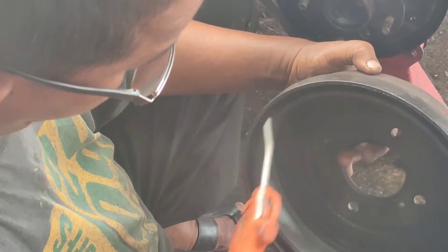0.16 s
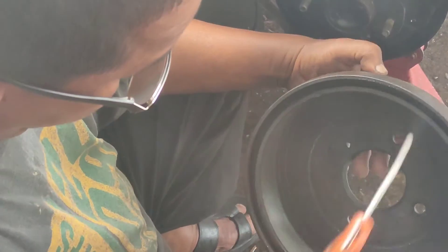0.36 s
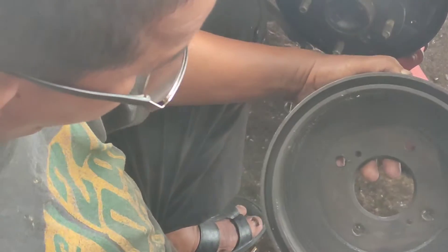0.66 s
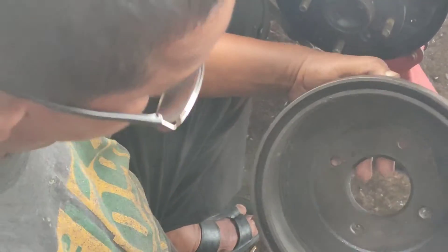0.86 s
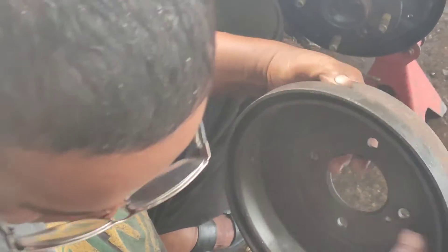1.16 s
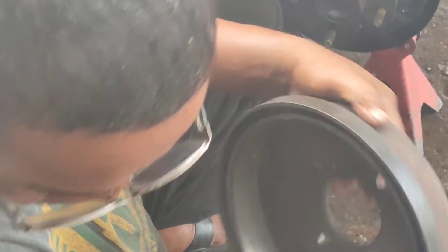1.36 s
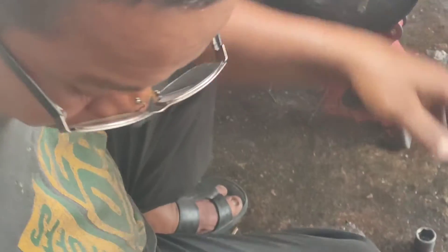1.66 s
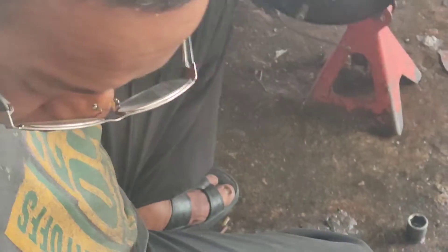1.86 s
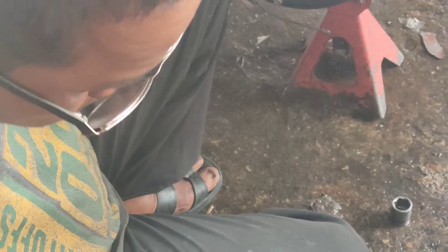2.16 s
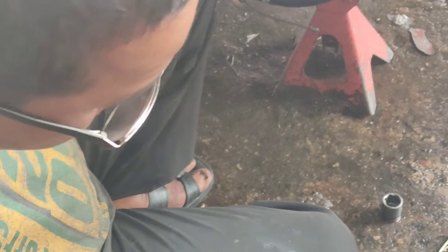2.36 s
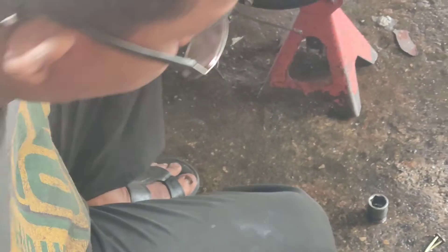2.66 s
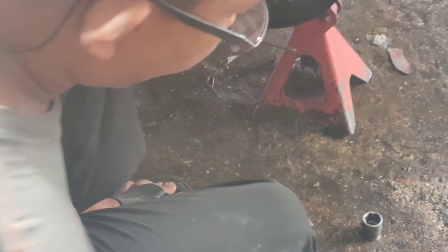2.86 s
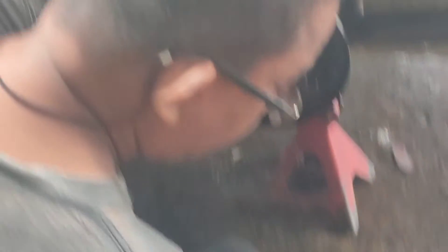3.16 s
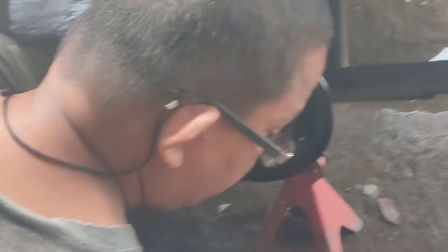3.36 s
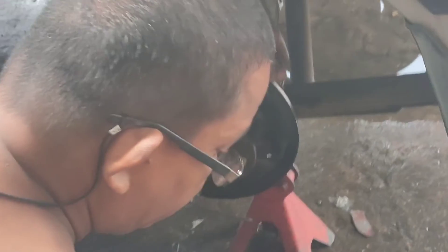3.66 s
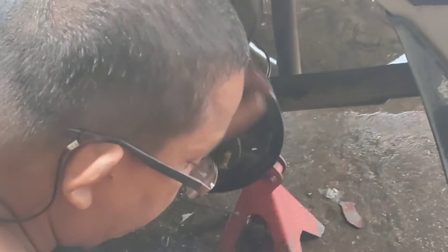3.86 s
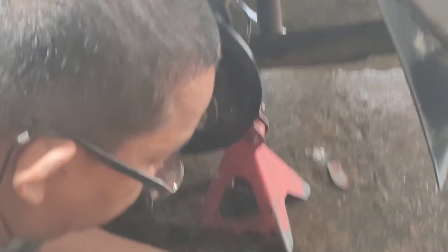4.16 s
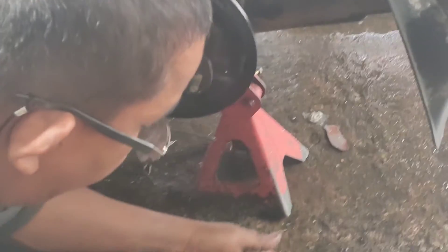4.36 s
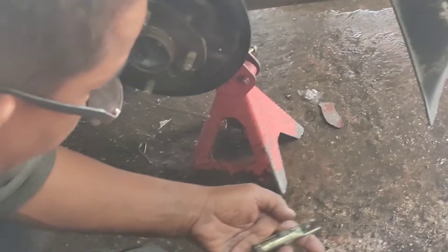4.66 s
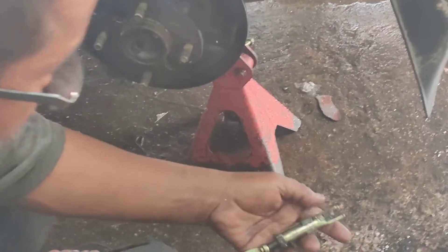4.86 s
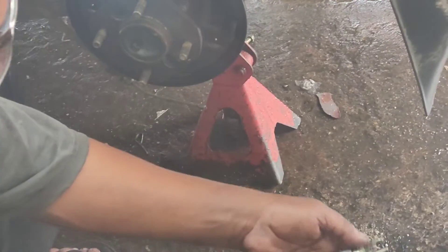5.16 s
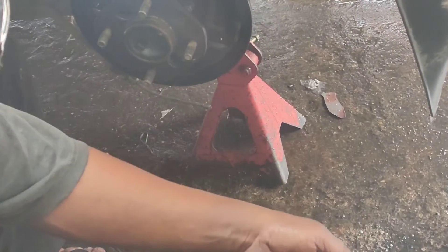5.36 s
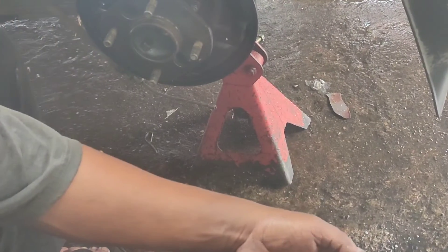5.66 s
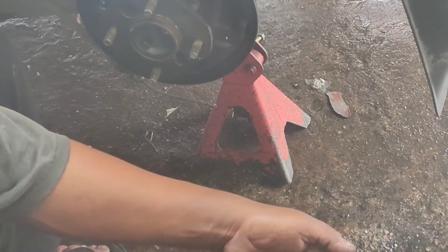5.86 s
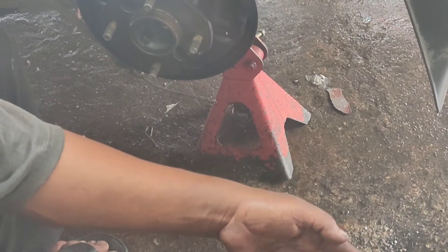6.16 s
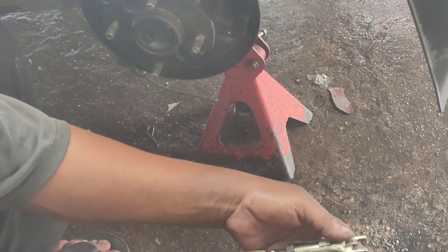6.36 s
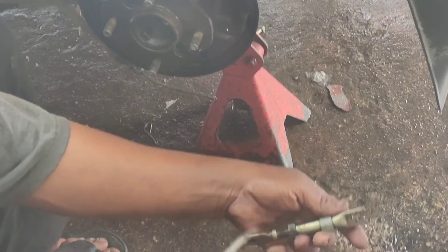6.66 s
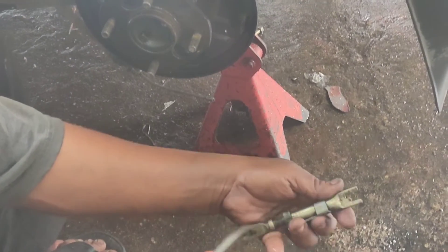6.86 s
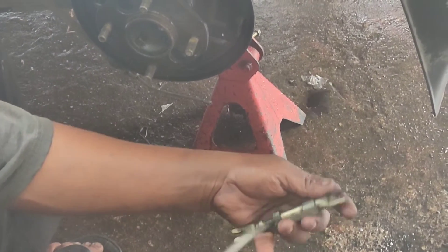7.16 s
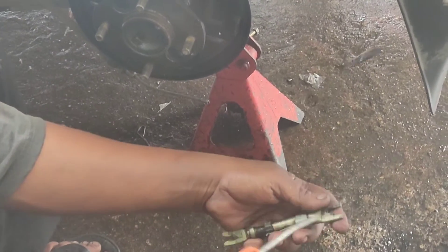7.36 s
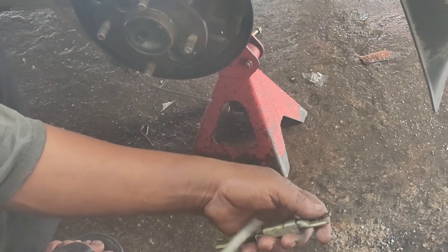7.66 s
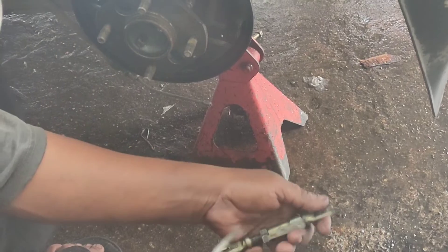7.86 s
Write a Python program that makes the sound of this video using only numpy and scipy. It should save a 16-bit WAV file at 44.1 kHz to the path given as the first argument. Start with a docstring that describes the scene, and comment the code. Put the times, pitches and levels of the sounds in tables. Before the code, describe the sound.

A close air blow gun hisses and cuts off, a compressor drones, an iron brake drum clanks onto gritty ground, then a long air blast returns.

```python
"""A blow gun is already hissing close to a two-port microphone in an open garage, and is fired again later on.
The hiss is coloured turbulent noise; the wind drives each port into its own soft limit.
A compressor drone lies under everything, and a coupling leaks between the bursts: both are filtered noise.
An iron brake drum is knocked, set down on gravel and scraped, as decaying modes plus noise clatter.
Shaped puffs and strokes of noise make a scuff and a few small ticks."""
import sys
import numpy as np
from scipy import signal
from scipy.fft import rfft, irfft, next_fast_len
from scipy.io import wavfile
from scipy.ndimage import uniform_filter1d

SR = 44100
rng = np.random.default_rng(int(sys.argv[2]) if len(sys.argv) > 2 else 0)


def dump(signal):
    """Clip the signal to [-1, 1] and save it as 16-bit WAV at the path in sys.argv[1]."""
    limited = np.clip(np.atleast_2d(signal).T, -1, 1)
    pcm = np.round(limited * 32767).astype(np.int16)
    wavfile.write(sys.argv[1], SR, pcm)


N = 353238

# trigger pulled and let go: open_s, shut_s, hiss_db before aim and surge, wind_db before surge and lulls
BURSTS = [(-0.1, 0.657, -23.5, -24), (5.317, 8.2, -21.5, -23.5)]
# how alike distant sound is at the two ports: frequency_hz, likeness (-1 to 1)
LIKENESS = [(60, 0.81), (180, 1), (550, 0.63), (1650, -0.17), (4970, 0.5), (15000, -0.6)]
SIDES = np.array([[.5], [-.5]])  # shares a left-right difference in dB between the channels


def amp(db):
    """Turns dB into an amplitude factor."""
    return 10 ** (np.asarray(db) / 20)


def evened(x):
    """Scales a signal to rms 1."""
    return x / np.sqrt(np.mean(x ** 2) + 1e-20)


def read(points, hz):
    """Reads a curve of (frequency, value) rows along a logarithmic frequency axis."""
    f, value = np.transpose(points)
    return np.interp(np.log(hz + 1), np.log(f + 1), value)


def lift(peaks, hz):
    """Sums the dB added by resonant peaks (centre, width, lift)."""
    return sum(db / (1 + (2 * (hz - f) / width) ** 2) for f, width, db in peaks)


def coloured(x, db_at):
    """Filters x by a dB function of frequency."""
    size = next_fast_len(N + 4096)
    gain = amp(db_at(np.fft.rfftfreq(size, 1 / SR)))
    return irfft(rfft(x, size) * gain, size)[..., :N]


def noise(db_at, patchy_db, same=((0, 0.), (1, 0.))):
    """Makes two channels of noise, rms 1, with drifting patches in time and frequency."""
    frames, hz = N // 128 + 5, np.fft.rfftfreq(512, 1 / SR)
    a, b, c, d, patches = rng.standard_normal((frames, 257, 5)).T
    patches = uniform_filter1d(patches, 12, 0)  # across frequency
    patches = evened(uniform_filter1d(patches, 24, 1))  # across time
    like = np.clip(read(same, hz), -1, 1)[:, None]
    left = a + 1j * b
    right = like * left + np.sqrt(1 - like ** 2) * (c + 1j * d)
    spectra = np.array([left, right]) * amp(patchy_db * patches)
    sound = signal.istft(spectra, nperseg=512, noverlap=384)[1][:, :N]
    return evened(coloured(sound, db_at))


def wander(hz):
    """Makes slow chance of rms 1, one track per channel, 6 dB down at hz."""
    return evened(coloured(rng.standard_normal((2, N)), lambda f: -20 * np.log10(1 + (f / hz) ** 2)))


def trigger_db(late_s, shut_db):
    """Per burst, dB around full flow: valve rise, pressure surge, hold, then shut_db(seconds since shut)."""
    open_s, surge_db, surge_s = 0.038, 3.5, 0.018
    t = np.arange(N) / SR
    tracks = []
    for start, end, *_ in BURSTS:
        rise_db = 20 * np.log10(np.clip((t - start - late_s) / open_s, 1e-5, 1) ** 2)
        surge = surge_db * np.exp(-abs(t - start - open_s) / surge_s)
        tracks.append(rise_db + surge + shut_db(np.maximum(t - end, 0)))
    return tracks


def hiss_db():
    """Left and right level of the nozzle: the valve snaps shut, then the barrel bleeds."""
    # the hiss follows the aim of the gun: time_s, change_db
    aim = [(0, -1.5), (.4, -2), (.48, -2.5), (.59, -1.5), (5.53, -2), (6.0, -0.5), (6.32, -0.5),
           (6.5, -2.5), (6.68, 0.5), (7.1, -2), (7.18, 1), (7.32, -5), (7.6, -0.5), (7.7, -1), (7.8, 2),
           (7.95, -0.5), (8.01, 0.5)]
    shut_db_per_s, bleed_db, bleed_db_per_s, lean_db = 700, -3, 118, 4.5

    def fall(s):
        return np.maximum(-shut_db_per_s * s, bleed_db - bleed_db_per_s * s)

    flow = np.max([row[2] + db for row, db in zip(BURSTS, trigger_db(0, fall))], axis=0)
    return flow + np.interp(np.arange(N) / SR, *np.transpose(aim)) + SIDES * lean_db


def nozzle():
    """Turbulent mixing noise, fluttering a little as the hand moves."""
    # colour of the jet at the nozzle: frequency_hz, relative_level_db per Hz
    jet_colour = [(300, -4.5), (1500, 4), (3000, -4.5), (4200, -4.5), (6000, 0.5), (9000, 0.5), (12000, 0),
                  (16000, -3.5)]
    flutter_db = 1.0 * wander(hz=25) + 0.63 * wander(hz=10)
    return amp(hiss_db() + flutter_db) * noise(lambda f: read(jet_colour, f), patchy_db=1.4)


def wind_db():
    """Left and right bite of the wind: it arrives late, drops, and after the shut trails off in a slower tail."""
    # the jet swings off the ports for a moment: middle_s, length_s, left_dip_db, right_dip_db
    lulls = [(0.0, .05, 10, 1), (0.051, 0.047, 7, 4.5), (0.13, 0.11, 3, -1), (0.274, 0.11, 8.5, 0),
             (0.461, 0.084, 9.5, 8), (0.51, 0.035, 14, 7.5), (0.584, 0.052, 3, 2.5), (0.65, 0.075, 9, 0),
             (5.345, 0.11, 9.5, 1.5), (6.364, 0.047, 7, 1), (7.052, 0.049, 6, 2.5), (7.266, .048, 16, 12),
             (7.278, .02, 9, 0), (7.675, 0.096, 1.5, 1.5)]
    late_s, calm_db_per_s, tail_db, tail_db_per_s, lean_db = 0.0075, 800, -23, 77, -1.5
    t = np.arange(N) / SR

    def fall(s):
        return np.maximum(-calm_db_per_s * s, tail_db - tail_db_per_s * s)

    flow = np.max([row[3] + db for row, db in zip(BURSTS, trigger_db(late_s, fall))], axis=0)
    dips = sum(np.outer([left, right], np.exp(-(2 * (t - s) / length) ** 4))  # rounded
               for s, length, left, right in lulls)
    return flow - dips + SIDES * lean_db


def wind():
    """Large eddies push each capsule into its soft limit; small ones keep growing with the gust, in lumps."""
    # large eddies: frequency_hz, relative_level_db per Hz, before the soft limit
    eddy_colour = [(20, -6), (50, -72), (100, -15), (200, -1.5), (350, -1), (600, -4), (1000, -8.5),
                   (2000, -25), (16000, -90)]
    # small eddies: frequency_hz, relative_level_db per Hz
    ripple_colour = [(100, -51), (400, -2), (1000, -2.5), (2000, -2), (3000, -5), (4500, -10),
                     (8000, -11.5), (16000, -19)]
    large_db, small_db = -16.5, 4.5  # small_db is relative to the bite
    bite_db = wind_db() + 1.3 * wander(hz=40) + 0.28 * wander(hz=24)
    push_db = np.minimum(1.4 * (bite_db + 33), 3.5)
    large = np.tanh(amp(push_db) * noise(lambda f: read(eddy_colour, f), patchy_db=0.87))
    # at the edge of the jet the eddies arrive as single thumps
    fringe = np.clip((-24 - bite_db) / 8, 0, 1)
    large = large * amp(fringe * (4.5 * wander(hz=90) - 1.5))
    lumps = amp(1.1 * wander(hz=250))
    small = amp(bite_db + small_db) * lumps * noise(lambda f: read(ripple_colour, f), patchy_db=1.24)
    return amp(large_db) * large + small


def compressor():
    """A steady drone: broad noise lifted by housing resonances, partly alike at both ports."""
    # body of the drone: frequency_hz, relative_level_db per Hz
    drone_colour = [(18, -79), (30, -20), (108, -13), (146, -11.5), (177, -5.5), (234, -6), (266, 0.5),
                    (296, -7.5), (337, -2.5), (455, -9), (517, -8.5), (720, -16.5), (900, -16.5),
                    (1000, -19.5), (1190, -12.5), (1440, -15.5), (2500, -18.5), (5000, -31.5), (6500, -49),
                    (11000, -120)]
    # housing resonances: frequency_hz, width_hz, lift_db
    housing = [(277.6, 26, 7.5), (181, 14, 4.5), (336, 19, 1), (1043, 54, 13.5), (1173, 79, 9),
               (632, 32, 8.5)]
    level_db = -42.5
    return amp(level_db) * noise(lambda f: read(drone_colour, f) + lift(housing, f),
                                 patchy_db=0.8, same=LIKENESS)


def leak():
    """Air hissing from a coupling, combed by an echo off a near surface; silent outside its table."""
    # course of the leak: time_s, level_db, left_right_db
    course = [(0.7, -41.5, -2), (0.96, -45, 1), (1.4, -48.5, 0), (2.5, -46.5, 0), (3.3, -47.5, 1),
              (4.3, -47, 0.5), (4.8, -46.5, 1), (5.33, -44, -1)]
    # colour of the leak ahead of the comb: frequency_hz, relative_level_db per Hz
    leak_colour = [(3000, -54), (4100, -8), (4700, -13), (5400, -1), (6600, 1.5), (8000, 1), (9500, -3),
                   (11200, -4.5), (13000, -5.5), (16000, -1.5)]
    comb_db, step_hz, first_hz = 2.4, 1220, 4120

    def combed(f):
        return read(leak_colour, f) + comb_db * np.cos(2 * np.pi * (f - first_hz) / step_hz)

    t, level_db = np.arange(N) / SR, np.full((2, N), -200.)
    s, db, lean_db = np.transpose(course)
    inside = (t >= s[0]) & (t <= s[-1])
    level_db[:, inside] = (np.interp(t, s, db) + SIDES * np.interp(t, s, lean_db))[:, inside]
    return amp(level_db) * noise(combed, patchy_db=1.0)


def scuff():
    """A sleeve or sandal drags: gritty noise that grows through the stroke, then dies away."""
    # grit under the stroke: frequency_hz, relative_level_db per Hz
    grit_colour = [(900, -32), (1500, -13), (2300, -1), (3500, -7.5), (5000, -7.5), (8000, -4), (12000, -8),
                   (16000, -13)]
    start_s, length_s, start_db, grows_db, t60_s = 0.96, 0.17, -45.5, 3.5, 1
    u = np.arange(N) / SR - start_s
    stroke_db = grows_db * np.minimum(u / length_s, 1) - 60 * np.maximum(u - length_s, 0) / t60_s
    drag = np.clip(u / 0.014, 0, 1) * amp(start_db + stroke_db + 1.3 * wander(hz=60))
    return drag * noise(lambda f: read(grit_colour, f), patchy_db=1.5)


def struck(modes, blows, clatter_t60):
    """Each blow adds to the ringing of the modes and rattles; high modes reach the ports out of step."""
    # the rough part of a blow: frequency_hz, relative_level_db per Hz
    clatter_colour = [(100, -65), (220, -40), (350, 5), (450, 0), (800, -2.5), (1400, -12.5), (2500, -7.5),
                      (3000, -25.5), (3700, -16.5), (4500, -30), (5300, -23), (7000, -26.5), (12000, -36),
                      (16000, -50)]
    contact_s = 0.0015  # a blow builds up
    dulling = 0.2  # lighter blows ring duller: dB per octave above the first mode, per dB of blow
    crack_db, crack_t60 = 2, 0.025  # the first contact stands above the clatter
    ringing, rattling = np.zeros((2, N + SR)), np.zeros((2, N + SR))
    t = np.arange(SR * 3 // 4) / SR
    hz, db, t60 = (c[:, None] for c in np.transpose(modes))
    skew = rng.standard_normal((2, len(modes), 1))
    for s, ring_db, lean_db, clatter_db in blows:
        spread_db = 1.2 * rng.standard_normal((2, len(modes), 1))
        dull_db = dulling * min(ring_db, 0) * np.log2(hz / hz[0])
        # phase runs on from the first blow
        phase = 2 * np.pi * hz * (t + s - blows[0][0]) + skew * hz / 2500
        ring = (amp(db + dull_db - 60 * t / t60 + spread_db) * np.sin(phase)).sum(1)
        contact = amp(SIDES * lean_db) * np.minimum(t / contact_s, 1)
        rattle = amp(-60 * t / clatter_t60) + amp(crack_db - 60 * t / crack_t60)
        span = slice(round(s * SR), round(s * SR) + len(t))
        ringing[:, span] += contact * amp(ring_db) * ring / amp(db).sum()
        rattling[:, span] += contact * amp(clatter_db) * rattle
    clatter = noise(lambda f: read(clatter_colour, f), patchy_db=4.0, same=LIKENESS)
    return ringing[:, :N] + rattling[:, :N] * clatter


def grinding():
    """A low, lumpy scrape that fades and stops."""
    # colour of the scrape: frequency_hz, relative_level_db per Hz
    scrape_colour = [(150, -40), (260, -13), (350, 3), (500, -5.5), (620, -2), (750, -14), (1200, -19),
                     (2500, -24), (5000, -49)]
    start_s, rise_s, end_s, start_db, db_per_s, lumps_db = 2.7, 0.034, 3.04, -35, -25, 1.2
    t = np.arange(N) / SR
    shape = np.clip((t - start_s) / rise_s, 0, 1) * np.clip((end_s - t) / rise_s, 0, 1)
    fade_db = start_db + db_per_s * np.maximum(t - start_s, 0) + lumps_db * wander(hz=25)[0]
    return shape * amp(fade_db) * noise(lambda f: read(scrape_colour, f), patchy_db=1.0, same=LIKENESS)


def echoes(x, t60):
    """Sparse taps of random sign from ground, car and walls, other taps per port."""
    at = np.arange(200, SR // 2 - 20, 20) + rng.integers(0, 20, (2, (SR // 2 - 201) // 20))
    taps = np.zeros((2, SR // 2))
    np.put_along_axis(taps, at, rng.choice([-1., 1.], at.shape) * amp(-60 * at / SR / t60), 1)
    return signal.fftconvolve(x, taps / np.linalg.norm(taps[0]), axes=1)[:, :N]


def brake_drum():
    """Iron knocked in the hand, landed on gravel and scraped, with little output below its lowest mode."""
    # modes when held in the hand: frequency_hz, relative_level_db, t60_s
    held_modes = [(455, 3, .06), (480, -8, .2), (646, -15, .22), (972, 1, .46), (1222, -2, .33),
                  (1504, -10, .3), (1577, -3, .21), (1678, -4, .22), (2358, -15, .2), (2482, -10, .2),
                  (2754, -6, .2), (3700, -19, .11), (5200, -25, .1)]
    # modes when resting on gravel: frequency_hz, relative_level_db, t60_s
    resting_modes = [(348, 4, 0.15), (395, 2, 0.12), (451.5, -4, 0.16), (495, -9, .16), (592, -8, 0.24),
                     (635, -13, .4), (978, -4, 0.16), (1225, -13, .16), (1573, -16, .9), (1650, -13, 0.2),
                     (2467, -8, .22), (3537, -15, .15), (5100, -23, .12), (6970, -28, .12)]
    # knock in the hand: time_s, ring_db, left_right_db, clatter_db
    knocks = [(2.2999, 0.5, -1, -26.5)]
    # the drum touches, lands and bounces: time_s, ring_db, left_right_db, clatter_db
    landing = [(2.581, -12, -1, -36), (2.601, 0, 0.5, -19), (2.617, -19, -2, -27), (2.638, -18, 2, -30),
               (2.669, -12, 1, -25), (2.682, -14, -2, -33), (2.711, -24, 1, -37)]
    low_hz, echo_db, echo_t60_s = 220, -9, 0.22
    iron = struck(held_modes, knocks, clatter_t60=0.29)
    iron = iron + struck(resting_modes, landing, clatter_t60=0.15) + grinding()
    iron = signal.sosfilt(signal.butter(2, low_hz, "high", fs=SR, output="sos"), iron)
    return iron + amp(echo_db) * echoes(iron, echo_t60_s)


def leak_swell():
    """A band at the top of the leak that grows slowly and stops short."""
    start_s, rise_s, end_s, level_db, lean_db, centre_hz, width_hz = 3.1, 1.0, 4.75, -52.5, 1, 8760, 2000
    t = np.arange(N) / SR
    shape = np.clip((t - start_s) / rise_s, 0, 1) * np.clip((end_s - t) / 0.036, 0, 1)
    band = noise(lambda f: -20 * np.log10(1 + (2 * (f - centre_hz) / width_hz) ** 2), patchy_db=0.6)
    return shape * amp(level_db + SIDES * lean_db) * band


def ticks():
    """Short puffs of noise through one broad resonance."""
    # small ticks: start_s, level_db, centre_hz, width_hz, t60_s, left_right_db
    puffs = [(4.432, -36.5, 1870, 1100, 0.13, -4), (4.44, -50, 2060, 200, .4, 0),
             (4.436, -34, 620, 300, 0.071, 1), (4.784, -45.5, 7000, 2000, 0.54, -4)]
    out, t = np.zeros((2, N)), np.arange(8192) / SR
    for s, db, hz, width, t60, lean_db in puffs:
        band = signal.butter(2, [hz - width / 2, hz + width / 2], "band", fs=SR, output="sos")
        puff = evened(signal.sosfilt(band, rng.standard_normal((2, 8192))))
        fade = amp(db - 60 * t / t60 + SIDES * lean_db)
        out[:, round(s * SR):][:, :8192] += fade * puff * np.minimum(t / 0.0063, 1)
    return out


def scene():
    """Airborne sound passes the port cavities; wind acts on the capsules directly."""
    # left port, then right port, each a list of cavity resonances: frequency_hz, width_hz, lift_db
    cavities = [
        [(9560, 2260, 11.5), (4200, 960, -3)],
        [(7270, 920, 10), (11400, 1300, -18)],
    ]
    air = nozzle() + compressor() + leak() + scuff() + brake_drum() + leak_swell() + ticks()
    heard = [coloured(side, lambda f: lift(port, f)) for side, port in zip(air, cavities)]
    return np.array(heard) + wind()


def record(dry):
    """The converter rounds off the highest peaks; then the rumble filter and the band limit."""
    ceiling, cut_hz, edge_hz = 1.1, 95, 15800
    rounded = ceiling * np.tanh(dry / ceiling)
    thinned = signal.sosfilt(signal.butter(2, cut_hz, "high", fs=SR, output="sos"), rounded)
    band_limit = signal.firwin(1023, edge_hz, window=("kaiser", 9), fs=SR)
    return signal.oaconvolve(thinned, band_limit[None], "same")


dry = scene()
out = record(dry)
dump(out)
```